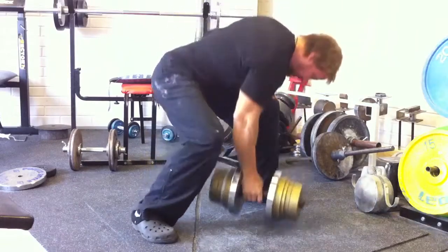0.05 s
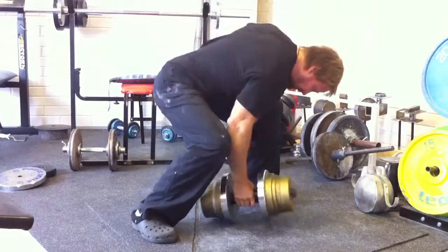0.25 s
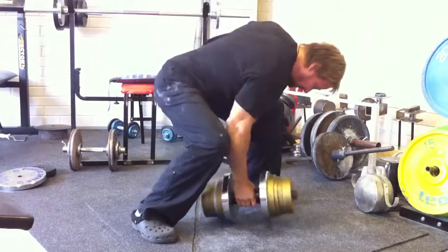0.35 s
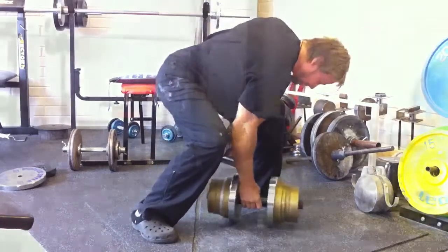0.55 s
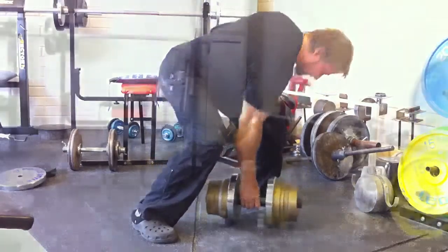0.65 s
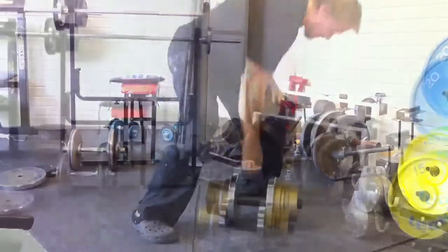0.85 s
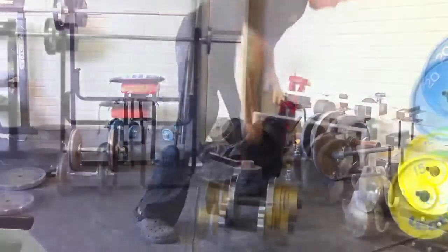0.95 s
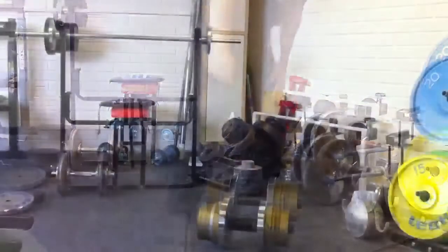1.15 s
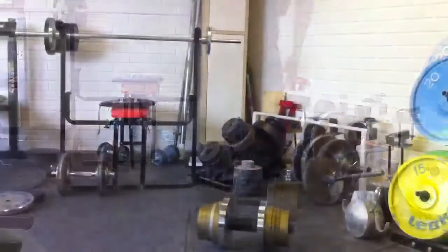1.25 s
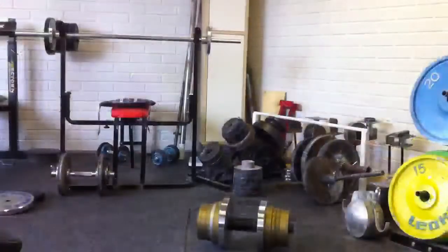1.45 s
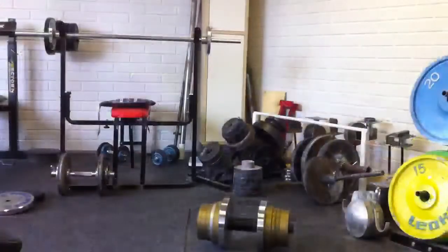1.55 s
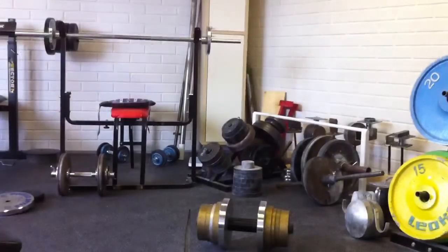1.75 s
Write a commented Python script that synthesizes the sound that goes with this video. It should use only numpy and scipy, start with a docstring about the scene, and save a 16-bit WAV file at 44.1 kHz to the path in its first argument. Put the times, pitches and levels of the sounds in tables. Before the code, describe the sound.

Heavy dumbbell set down with two booming thuds and rattling metal plates in a small gym.

```python
"""A plate-loaded dumbbell is set down hard on a rubber gym floor: one end lands, then the other. Its loose
steel plates clack, chatter and ring as it settles. The floor booms under the weight and a small brick room
answers. A faint rustle comes first, then a soft swell of noise leads into the first impact. Ventilation rumble
and a faint hiss lie under everything; a very faint squeak comes near the end."""
import sys
import numpy as np
from scipy import signal
from scipy.fft import rfft, irfft, next_fast_len
from scipy.io import wavfile
from scipy.ndimage import map_coordinates

SR = 44100
rng = np.random.default_rng(int(sys.argv[2]) if len(sys.argv) > 2 else 0)


def output_pcm(signal):
    """Save a mono or channel-first signal as 16-bit PCM at the path in sys.argv[1].

    Samples are clipped to [-1, 1] before scaling.
    """
    pcm = np.clip(np.atleast_2d(signal).T, -1, 1) * 32767
    wavfile.write(sys.argv[1], SR, np.round(pcm).astype(np.int16))


N = 79380  # 1.8 s


def amp(db):
    """dB to gain."""
    return 10 ** (np.asarray(db) / 20)


def along(points, hz):
    """Interpolate (f/Hz, value) points on a log axis."""
    f, v = np.transpose(points)
    return np.interp(np.log(hz + 1), np.log(f + 1), v)


def since(start_s):
    """Seconds since start_s, zero before."""
    return np.maximum(np.arange(N) / SR - start_s, 0)


def envelope(points):
    """Gain curve through (t/s, level/dB) points."""
    return amp(np.interp(since(0), *np.transpose(points)))


def fade(t, t60_s):
    """Exponential decay."""
    return np.exp(-np.log(1000) * t / t60_s)


def rise(t, tau_s):
    """Exponential onset."""
    return 1 - np.exp(-t / tau_s)


def wobble(rate_hz):
    """Smooth random curve."""
    return map_coordinates(rng.standard_normal(N // 20), [since(0) * rate_hz], mode="wrap")


def noise(spectrum, eq_db=lambda hz: 0):
    """Shaped noise, scaled to rms 1, then equalised."""
    hz = np.fft.rfftfreq(N, 1 / SR)
    shaped = irfft(rfft(rng.standard_normal(N)) * amp(along(spectrum, hz)), N)
    shaped /= np.sqrt(np.mean(shaped ** 2) + 1e-20)
    return irfft(rfft(shaped) * amp(eq_db(hz)), N)


# Rumble spectrum: f/Hz, relative density/dB
VENT_SPECTRUM = [(15, -72.5), (25, -37), (43, -49), (59, -30.5), (107, -16), (144, -1.5), (221, -8),
                 (349, -20.5), (457, -16), (762, -24.5), (1270, -27.5), (1950, -35.5), (15500, -45)]
# Rumble envelope: t/s, level/dB
VENT_LEVEL = [(0, -53.5), (1.1, -57), (1.8, -53)]
def ventilation():
    """Moving air: a low rumble."""
    return envelope(VENT_LEVEL) * noise(VENT_SPECTRUM)


# Hiss envelope: t/s, level/dB
HISS_LEVEL = [(0, -68), (1.1, -75), (1.8, -70)]
def hiss():
    """Faint white noise."""
    return envelope(HISS_LEVEL) * rng.standard_normal(N)


# Rustle and swell spectrum: f/Hz, relative density/dB
LEAD_IN_SPECTRUM = [(300, -1.5), (1200, -4.5), (2300, 2), (3300, -4.5), (5000, -4), (8000, -15),
                    (15000, -10.5)]
# Rustle and swell envelope: t/s, level/dB
LEAD_IN_LEVEL = [(0, -65), (.11, -61), (.17, -56), (.21, -45.5), (.26, -52.5), (.5, -90.5)]
def lead_in():
    """A faint rustle, then a soft swell of noise leading into the first impact."""
    return envelope(LEAD_IN_LEVEL) * noise(LEAD_IN_SPECTRUM)


# Squeak glide: t/s, lower f/Hz, upper f/Hz, level/dB
SQUEAK_GLIDE = [(1.62, 4520, 10700, -83.5), (1.656, 4740, 11440, -70), (1.695, 4720, 12200, -72.5),
                (1.72, 4700, 11800, -75), (1.745, 4870, 12640, -72.5), (1.785, 5080, 12700, -77)]
def squeak(upper_db=-7):
    """Two thin, unsteady rising tones."""
    knots_s, lower_hz, upper_hz, level_db = np.transpose(SQUEAK_GLIDE)
    t = since(0)

    def tone(hz):
        cycles = np.cumsum(np.interp(t, knots_s, hz)) / SR
        return np.sin(2 * np.pi * cycles + wobble(rate_hz=200))

    gate = (t > knots_s[0]) * (t < knots_s[-1])
    gain = gate * amp(np.interp(t, knots_s, level_db))
    return gain * (tone(lower_hz) + amp(upper_db) * tone(upper_hz))


# Brick room reverberation: f/Hz, T60/s
ROOM_T60 = [(100, 0.96), (260, 0.93), (550, 0.44), (1800, 0.41), (5000, 0.33), (9000, 0.28), (14000, 0.18)]
def room_decay(x, start_s):
    """From start_s on, each band dies at the room's rate."""
    hz, t, bands = signal.stft(x, SR, nperseg=256)
    bands *= fade(np.maximum(t - start_s, 0), along(ROOM_T60, hz)[:, None])
    return signal.istft(bands, SR, nperseg=256)[1][:N]


# Each end landing: t/s, boom/dB, boom tilt/(dB/octave), thump/dB, push/dB
END_LANDINGS = [(0.2218, -27, 3.5, -31, -11), (0.5788, -41, -18, -34.5, -17.5)]
# Floor and room bass modes: f/Hz, relative level/dB, T60/s
BASS_MODES = [(146, -3, .5), (164, -5, .55), (187, -7, .9), (262, -1, .78), (285, 3, .62), (324, 1.5, .52),
              (436, 2.5, .33), (476, -4, .33), (626, -1, .3), (679, -4, .3)]
# Thump spectrum: f/Hz, relative density/dB
THUMP_SPECTRUM = [(25, -37), (45, -25), (80, -16.5), (105, -4), (140, 1), (220, -1.5), (400, -6),
                  (1000, -51.5)]
def floor(push_hz=240):
    """Each landing excites the bass modes, a dull thump and one short low push."""
    out = np.zeros(N)
    low_cut = signal.butter(4, 120, "highpass", fs=SR, output="sos")
    for start_s, boom_db, tilt_db, thump_db, push_db in END_LANDINGS:
        t = since(start_s)
        for hz, mode_db, t60_s in BASS_MODES:
            octaves = np.log2(hz / BASS_MODES[0][0])
            gain = amp(boom_db + mode_db + tilt_db * octaves)
            tone = np.sin(2 * np.pi * (hz * t + rng.random()))
            out += gain * tone * rise(t, tau_s=.018) * fade(t, t60_s)
        out += amp(thump_db) * noise(THUMP_SPECTRUM) * rise(t, tau_s=.008) * fade(t, t60_s=1)
        push = np.sin(2 * np.pi * push_hz * t) * fade(t, t60_s=.014)
        out += amp(push_db) * signal.sosfilt(low_cut, push)
    return out


def settling_ping(start_s=.81, hz=3440, level_db=-59):
    """A last small ring as the plates settle."""
    t = since(start_s)
    return amp(level_db) * np.sin(2 * np.pi * hz * t) * fade(t, t60_s=.26)


# Four EQ bands that colour a contact, each: f/Hz, weight
LOW_MID_BAND = [(100, 0.38), (250, 1), (500, 0.41), (800, 0.016)]
CLANK_BAND = [(550, 0), (850, 1), (1030, 1), (1400, 0)]
RATTLE_BAND = [(1950, 0), (2250, 0.73), (2600, 0.9), (3100, 0)]
TREBLE_BAND = [(2500, 0), (9000, 1)]
def colour_db(hz, low_mid_db=0, clank_db=0, rattle_db=0, treble_db=0):
    """One contact's boost or cut at hz."""
    return (low_mid_db * along(LOW_MID_BAND, hz) + clank_db * along(CLANK_BAND, hz)
            + rattle_db * along(RATTLE_BAND, hz) + treble_db * along(TREBLE_BAND, hz))


# Plate and bar modes: f/Hz, relative level/dB, T60/s
STEEL_MODES = [(820, 13, .03), (890, -4, .3), (980, -3, .3), (1880, -3, .28), (2250, -8, .35),
               (2520, -8, .33), (4320, -3, .2), (4952, 2, .19), (5040, 2, .2), (8900, -18, .35),
               (9249, -17, .38), (9368, -5, .22), (10670, -14, .2), (11980, -19, .33), (12150, -15, .22),
               (14020, -19, .28), (15600, -26, .2)]
def plate_ring(contacts, wander_rad=.45, scatter_db=1.5):
    """Every contact rings the steel anew; the loose stack keeps the tones slightly unsteady."""
    out = np.zeros(N)
    for hz, mode_db, t60_s in STEEL_MODES:
        wander = wander_rad * wobble(rate_hz=70)
        for start_s, _, _, clank_db, _, treble_db, _, ring_db in contacts:
            t = since(start_s)
            tone = np.sin(2 * np.pi * (hz * t + rng.random()) + wander)
            level_db = ring_db + mode_db + colour_db(hz, clank_db=clank_db, treble_db=treble_db)
            level_db += scatter_db * rng.standard_normal()
            out += amp(level_db) * tone * rise(t, tau_s=.001) * fade(t, t60_s)
    return out


# Plate-on-plate spectrum: f/Hz, relative density/dB
CLACK_SPECTRUM = [(50, -19.5), (130, -0.5), (300, 1.5), (600, 4), (1100, 1.5), (1700, 1), (2600, -2.5),
                  (3500, -10.5), (4050, -6.5), (4400, -1), (5120, -0.5), (5450, -6), (7200, -16.5),
                  (8600, -12.5), (10000, -21.5), (11600, -17), (13000, -26.5), (14000, -26), (15500, -35)]
# Direct crack over the room's echo: f/Hz, gain/dB
CRACK_EQ = [(150, -2.5), (500, 3.5), (1000, 7), (2200, 3), (3300, 9), (4700, 14), (7000, 4.5), (10000, 7),
            (14000, 12.5)]
# Spectral ripple from the plates' many overtones: f/Hz, depth/dB
RIPPLE_DEPTH = [(600, 1), (2000, 2), (6000, 2.5), (10000, 4.5), (15000, 5.5)]
def plate_clacks(contacts, chatter_span_s=.06, chatter_db=-15.5, ripple_step_hz=70.03):
    """Plates collide: a brief crack, five weaker knocks at random, a diffuse room echo."""
    out = np.zeros(N)
    ripple = rng.standard_normal(N // 20)

    def ripple_db(hz):
        return along(RIPPLE_DEPTH, hz) * map_coordinates(ripple, [hz / ripple_step_hz], mode="wrap")

    def burst(start_s, hold_s=.00067):
        return rise(since(start_s), tau_s=.0001) * fade(since(start_s + hold_s), t60_s=.023)

    for start_s, clack_db, *bands_db, crack_db, _ in contacts:
        delays_s = chatter_span_s * rng.random(size=5)
        chatter = sum(fade(delay, t60_s=.23) * burst(start_s + delay) for delay in delays_s)
        crack = noise(CLACK_SPECTRUM, lambda hz: colour_db(hz, *bands_db) + along(CRACK_EQ, hz))
        crack *= burst(start_s) + amp(chatter_db) * chatter
        diffuse = noise(CLACK_SPECTRUM, lambda hz: colour_db(hz, *bands_db) + ripple_db(hz))
        echo = room_decay(diffuse, start_s) * rise(since(start_s), tau_s=.004)
        out += amp(clack_db) * (amp(crack_db) * crack + echo)
    return out


# Plate contacts: t/s, clack/dB, EQ (low-mid/dB, clank/dB, rattle/dB, treble/dB), crack gain/dB, ring/dB
PLATE_CONTACTS = [(0.2147, -38, 9.5, 4.5, -1, -7, -0.5, -62), (.222, -16.5, 0, -4.5, -0.5, 1, 1.5, -24.5),
                  (0.2398, -22.5, 6, -0.5, -5, -8.5, -5, -42.5), (0.246, -27, 1.5, -2, 0, -1.5, -4, -30),
                  (0.5779, -24, -7, 6.5, 5.5, 4, 2, -35.5), (.5903, -40, -1, 13.5, -10, 1.5, 9, -63.5),
                  (0.601, -36, 0, 8.5, -4, -4, 3, -39.5), (0.7181, -35, -5, -1.5, 2, -9, -0.5, -47),
                  (.808, -50.5, -2.5, 3, 1, -0.5, -17.5, -65)]
def dumbbell():
    """The loose plates knock together and ring as the ends land and settle."""
    return plate_clacks(PLATE_CONTACTS) + plate_ring(PLATE_CONTACTS) + settling_ping()


def scene():
    """Mono mix."""
    return (dumbbell() + floor() + squeak() + ventilation() + hiss() + lead_in())[None]


def record(dry, cutoff_hz=16000):
    """Soft peak limiter, then brick-wall low-pass."""
    limited = dry / (1 + np.abs(dry) ** 10) ** (1 / 10)
    size = next_fast_len(N + SR // 2)
    passband = np.fft.rfftfreq(size, 1 / SR) < cutoff_hz
    return irfft(rfft(limited, size) * passband, size)[:, :N]


dry = scene()
out = record(dry)
output_pcm(out)
```